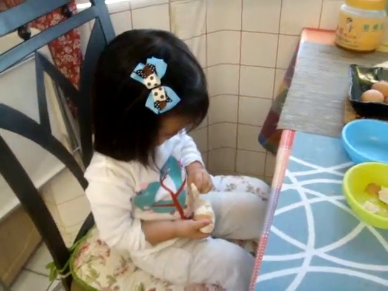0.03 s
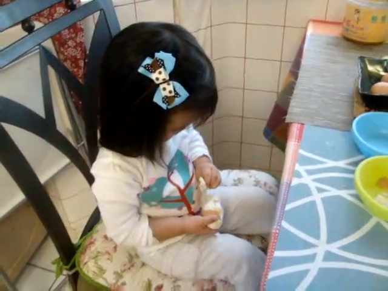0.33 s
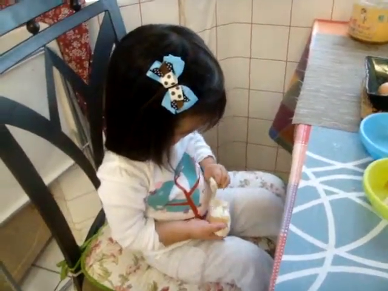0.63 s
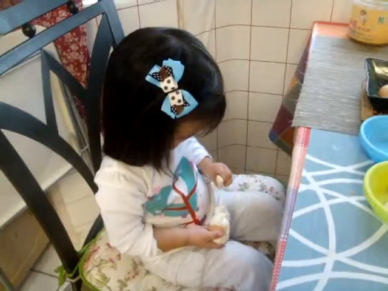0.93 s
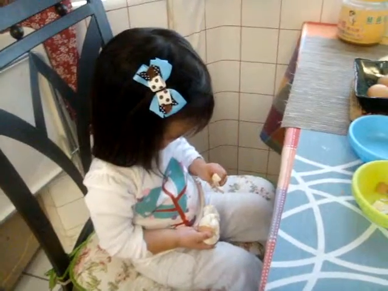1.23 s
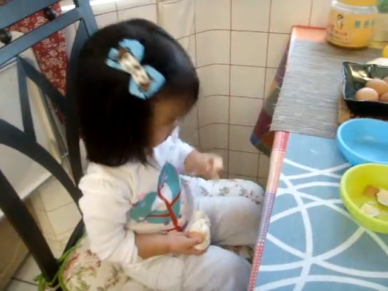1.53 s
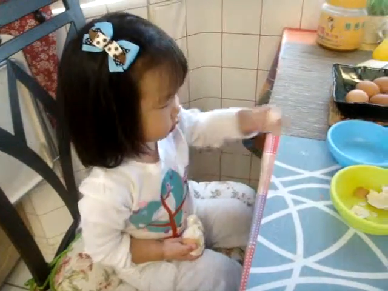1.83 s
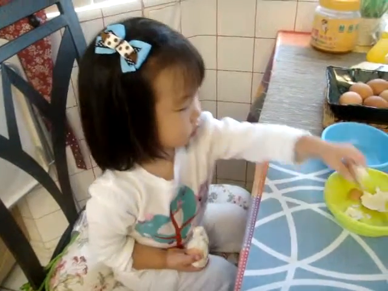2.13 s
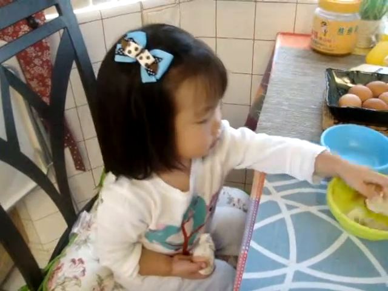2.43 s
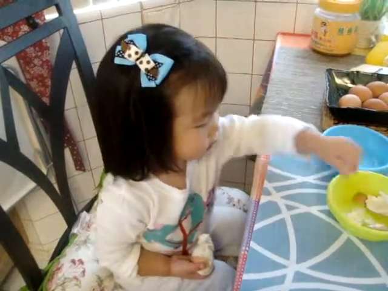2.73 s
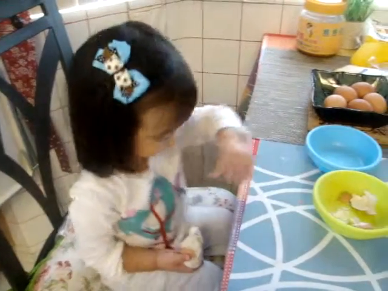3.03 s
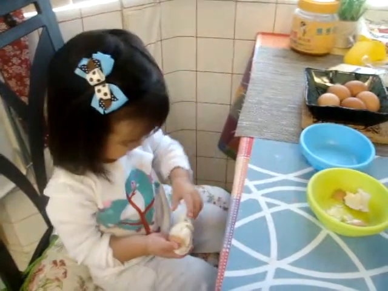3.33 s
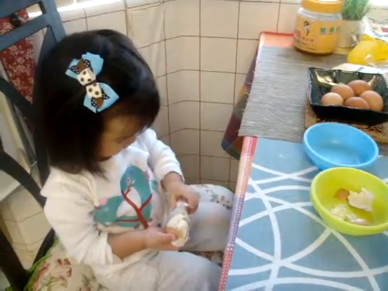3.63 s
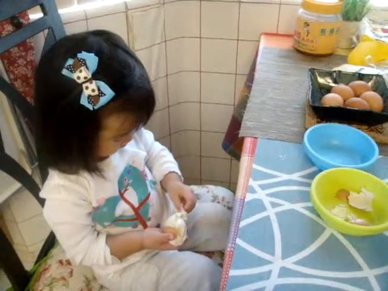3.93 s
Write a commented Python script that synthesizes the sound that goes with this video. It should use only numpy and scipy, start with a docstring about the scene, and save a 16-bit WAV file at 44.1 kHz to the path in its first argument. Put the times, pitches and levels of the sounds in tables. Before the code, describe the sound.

A boiled egg is peeled in a quiet tiled kitchen: tiny crisp cracks, a slight squeak, then shell dropping into a plastic bowl. A spinning appliance hums softly and dies down before the final faint cracks.

```python
"""A boiled egg is peeled by hand in a small tiled kitchen, over room noise and a spinning appliance's hum.
In the first second the shell snaps and crackles in little bursts; then it rubs with a tiny squeak.
At about 2.3 seconds a piece drops into a plastic bowl, clatters and settles, with a faint falling squeak.
Near 3 seconds the hum dies down, a deep rumble swells briefly, and the shell gives a few last cracks."""
import sys
import numpy as np
from scipy import signal
from scipy.fft import rfft, irfft
from scipy.io import wavfile

SR = 44100
rng = np.random.default_rng(int(sys.argv[2]) if len(sys.argv) > 2 else 0)


def wav_record(signal):
    """Record a signal, one row per channel, as 16-bit PCM in the file named by sys.argv[1]."""
    frames = np.transpose(np.atleast_2d(signal))
    bounded = np.clip(frames, -1, 1)
    # unit amplitude maps onto the largest positive 16-bit level
    quanta = np.round(bounded * 32767).astype(np.int16)
    wavfile.write(sys.argv[1], SR, quanta)


N = 176400
TIME = np.arange(N) / SR
TOP_HZ = 10020


def from_db(db):
    """Turn decibels into a number to multiply by."""
    return 10 ** (np.asarray(db) / 20)


def fade(t, fade_s):
    """A dying away that falls 60 dB every fade_s seconds."""
    return from_db(-60 * t / fade_s)


def unit_level(x):
    """Scale a signal so its average (rms) level is 1."""
    return x / np.sqrt(np.mean(x ** 2) + 1e-20)


def keep_side(x, hz, side, order=2):
    """Let through the "high" or "low" side of hz; a higher order cuts more steeply."""
    sos = signal.butter(order, np.clip(hz, 10, .45 * SR), side, fs=SR, output="sos")
    return signal.sosfilt(sos, x + 1e-18)


def keep_band(x, low_hz, high_hz, low_order=4):
    """Let through what lies between two frequencies."""
    return keep_side(keep_side(x, low_hz, "high", low_order), high_hz, "low", order=4)


def shaped_noise(shape):
    """Noise at level 1 whose tone follows rows of (Hz, dB)."""
    hz, db = np.transpose(shape)
    bins = np.maximum(np.fft.rfftfreq(N, 1 / SR), 1)
    gain = from_db(np.interp(np.log(bins), np.log(hz), db))
    return unit_level(irfft(rfft(rng.standard_normal(N)) * gain, N))


def drift(per_s):
    """A smooth random wobble of size about 1."""
    bins = np.fft.rfftfreq(N, 1 / SR)
    return unit_level(irfft(rfft(rng.standard_normal(N)) / (1 + (bins / per_s) ** 2) ** 2, N))


def gate(start, length, ramp_s):
    """Fade in, hold, and fade out again."""
    return np.clip(np.minimum(TIME - start, start + length - TIME) / ramp_s, 0, 1)


def burst(fade_s, low_hz, high_hz=TOP_HZ, rise_s=0.00025):
    """A crack or tap: a spurt of noise that dies at once."""
    t = TIME[:SR // 10]
    decay = fade(t, fade_s)
    spurt = rng.standard_normal(len(t)) * decay * np.minimum(t / rise_s, 1)
    spurt = keep_band(spurt, low_hz, high_hz)
    return spurt * np.sqrt(np.sum(decay ** 2) / np.sum(spurt ** 2))


def add(out, start, x):
    """Mix x into out, beginning at start seconds."""
    i = int(np.clip(start * SR, 0, N - 1))
    out[i:i + len(x)] += x[:N - i]


# The tone of the room noise. Each row: frequency in Hz, relative strength in dB.
ROOM_TONE = [(20, -27), (32, -10), (42, -2.5), (58, -2), (80, -4), (115, -2.5), (170, 8), (230, 1.5),
             (350, 3), (520, -2), (660, 0.5), (800, 4.5), (960, 3), (1120, -3), (1450, -3.5), (2200, -13),
             (3500, -18), (6000, -20.5), (10000, -22.5)]


def room_noise():
    """A soft, steady rush, mostly low and middle tones."""
    return from_db(-46.5) * shaped_noise(ROOM_TONE)


def deep_swell(peak_s=3.4, half_width_s=0.23):
    """A faint, deep rumble that comes and goes."""
    rumble = unit_level(keep_band(rng.standard_normal(N), low_hz=42, high_hz=62))
    return from_db(-61) * np.exp(-((TIME - peak_s) / half_width_s) ** 2) * rumble


# How fast the appliance spins. Each row: time in seconds, turns per second.
SPIN_SPEED = [(0, 19.72), (.6, 19.95), (1.5, 20.07), (2.4, 20.19), (4, 20.17)]
# How its loudness changes. Each row: time in seconds, relative level in dB.
APPLIANCE_LEVEL = [(0, -46), (.75, -46), (.96, -43.5), (1.13, -48.5), (1.35, -45), (1.58, -45), (1.78, -43),
                   (2.25, -43.5), (2.65, -47.5), (2.98, -48), (3.15, -64.5), (4, -60.5)]
# The tones in its hum. Each row: vibrations per turn, relative level in dB.
HUM_TONES = [(6, -24.5), (7, -23.5), (8, -15), (9, 1), (10, -12.5), (11, -5), (12, -11), (13, -15),
             (14, -10), (17, -15), (19, -18), (21, -29.5)]
# The tone of its rumble. Each row: frequency in Hz, relative strength in dB.
RUMBLE_TONE = [(60, -38), (130, -28.5), (170, 2), (225, -2.5), (290, -11), (380, -10.5), (600, -13),
               (1500, -32.5)]


def appliance(waver_db=0.86):
    """An off-balance spinning part hums at multiples of its turning speed, over a low rumble."""
    turns_per_s = np.interp(TIME, *np.transpose(SPIN_SPEED))
    level_db = np.interp(TIME, *np.transpose(APPLIANCE_LEVEL))
    angle = 2 * np.pi * np.cumsum(turns_per_s) / SR
    hum = np.zeros(N)
    for per_turn, db in HUM_TONES:
        gain = from_db(db - waver_db * drift(per_s=3.1))
        hum += gain * np.sin(per_turn * angle + rng.uniform(0, 2 * np.pi))
    rumble = from_db(-9.5) * shaped_noise(RUMBLE_TONE)
    return from_db(level_db - 2.5) * (np.sqrt(2) * hum + rumble)


def kitchen_echo(sound, first_echo_s=0.0031):
    """Sound bounces off the tiles and table top in a blur of echoes."""
    t = TIME[:SR // 2]
    tail = rng.standard_normal(len(t)) * fade(t, fade_s=0.91) * (t > first_echo_s)
    return signal.fftconvolve(sound, tail / np.sqrt(np.sum(tail ** 2)))[:N]


# Squeaks of shell. Each row: start and length in seconds, first, middle and last pitch in Hz,
# level in dB, pitch wobble in Hz.
SHELL_SQUEAKS = [(1.41, 0.041, 5020, 5200, 5330, -57, 422), (2.427, .215, 4680, 4100, 3850, -64, 80)]


def squeaks(flutter_db=2):
    """Thin, unsteady whistles slide in pitch as shell rubs under the fingers."""
    out = np.zeros(N)
    for start, length, first_hz, middle_hz, last_hz, db, wobble_hz in SHELL_SQUEAKS:
        slide = np.interp(TIME - start, [0, length / 2, length], [first_hz, middle_hz, last_hz])
        hz = slide + wobble_hz * drift(per_s=450)
        gain = gate(start, length, ramp_s=0.013) * from_db(db + flutter_db * drift(per_s=80))
        out += gain * np.sin(2 * np.pi * np.cumsum(hz) / SR)
    return out


# The notes the bowl rings with. Each row: pitch in Hz, relative level in dB, fade time in seconds.
BOWL_NOTES = [(1010, -11, 0.14), (1190, -13, 0.045), (1647, -5.5, 0.026), (1800, -9, .02), (2450, -13, .06),
              (2570, -7.5, 0.027), (2715, 0, .025), (2886, 1, 0.043), (3570, -8, 0.027), (3820, -20, 0.079),
              (4900, -18, .05), (6500, -16, 0.03)]
# Shell hitting the bowl and the pieces in it. Each row: start in seconds, tick level in dB,
# the tick's lowest frequency in Hz, knock level in dB.
BOWL_HITS = [(2.2928, -23, 4800, -37), (2.2989, -28, 3800, -26.5), (2.3034, -35, 2400, -32.5),
             (2.3060, -34, 5000, -43), (2.3138, -37, 3500, -43), (2.3243, -46, 3800, -40),
             (2.3352, -43, 3800, -46), (2.3398, -42, 5500, -47), (2.3455, -24, 2600, -55),
             (2.3512, -28.5, 5000, -56), (2.356, -36, 6500, -51), (2.3648, -32, 3200, -51),
             (2.3695, -42, 5000, -51), (2.3777, -40, 4500, -52), (2.3885, -37, 4800, -58),
             (2.3907, -38, 4800, -58), (2.4254, -39, 7500, -60), (2.4305, -38, 4500, -60),
             (2.489, -46, 8500, -65), (2.523, -36.5, 8400, -65)]


def bowl_clatter(low_hz=690, ring_db=-2.5):
    """Each hit is a bright tick of shell and a knock that briefly rings the bowl."""
    out, t = np.zeros(N), TIME[:SR // 4]
    for start, tick_db, tick_low_hz, knock_db in BOWL_HITS:
        ring = np.zeros(len(t))
        for hz, db, fade_s in BOWL_NOTES:
            strength = from_db(db + rng.normal(0, 2.4)) * rng.choice([-1, 1])  # no two hits ring alike
            ring += strength * np.sin(2 * np.pi * hz * t) * fade(t, fade_s)
        add(out, start, from_db(tick_db) * burst(fade_s=0.016, low_hz=tick_low_hz))
        knock = burst(fade_s=0.019, low_hz=low_hz, high_hz=4700)
        add(out, start, from_db(knock_db) * keep_side(knock, low_hz, "high", order=4))
        add(out, start, from_db(knock_db + ring_db) * keep_side(ring, low_hz, "high", order=4))
    return out


# Patches of crumbling shell. Each row: start and length in seconds, level in dB,
# lowest and highest frequency in Hz.
SHELL_CRACKLES = [(0, 0.064, -48.5, 3300, 6800), (.062, 0.082, -58.5, 2500, 6550),
                  (.26, .03, -60.5, 4500, 8000), (0.472, 0.021, -58, 4500, 9000),
                  (0.554, 0.051, -60, 5500, 11000), (0.624, 0.081, -55, 4600, 12000),
                  (0.722, 0.072, -55.5, 2800, 12000), (2.243, 0.022, -47, 5200, 12000),
                  (2.296, 0.026, -47, 3000, 11000), (2.351, 0.051, -53, 5200, 11100),
                  (2.42, 0.019, -55, 4500, 11000), (3.362, 0.1, -62.5, 4500, 10000),
                  (3.788, 0.046, -61, 5000, 11000)]


def crackles(cracks_per_s=1100, spread_db=0.5, fade_s=0.0045):
    """Bending and rubbing the shell sets off crowds of tiny, uneven cracks."""
    out = np.zeros(N)
    starts = rng.random(N) < cracks_per_s / SR
    cracks = starts * from_db(spread_db * np.minimum(rng.exponential(1, N), 4))
    loudness = signal.lfilter([1], [1, -fade(1 / SR, fade_s)], cracks + 1e-18)  # each crack dies away
    grit = keep_side(loudness * rng.standard_normal(N), TOP_HZ, "low", order=6)
    for start, length, db, low_hz, high_hz in SHELL_CRACKLES:
        patch = keep_band(grit * gate(start, length, ramp_s=0.0042), low_hz, high_hz, low_order=3)
        out += from_db(db) * patch * np.sqrt(length * SR / (np.sum(patch ** 2) + 1e-12))
    return out


# Single snaps of shell. Each row: start in seconds, level in dB, the crack's lowest and highest
# frequency in Hz, ring level in dB compared with the crack.
SHELL_SNAPS = [(0.0158, -30.5, 4000, 10000, -9), (0.0263, -31.5, 2300, 6600, -17),
               (.032, -40, 1790, 6200, -9), (0.0374, -33, 2200, 6000, -17), (0.043, -43, 2500, 6500, -9),
               (0.0488, -41, 3200, 6800, -12), (0.079, -38, 1800, 6040, -14),
               (.4735, -41.5, 3000, 10000, -14), (.555, -41, 5500, 11000, -16),
               (0.5915, -42, 4500, 10000, -16), (0.6412, -29.5, 6000, 12000, -20),
               (.6495, -42, 6000, 11000, -20), (0.655, -44, 6500, 11000, -20),
               (.662, -43, 5000, 11000, -20), (0.6655, -42, 6500, 11000, -20),
               (.6795, -36, 6500, 11000, -20), (.683, -43, 6500, 11000, -20),
               (0.6977, -39, 6000, 10000, -20), (0.7260, -31, 5500, 12000, -20),
               (0.7432, -45, 2600, 9000, -17), (.7675, -47, 4500, 11000, -18),
               (0.79, -45, 4000, 11000, -18), (0.7945, -42, 3500, 11000, -18),
               (3.9452, -34, 6840, 11000, -7), (3.986, -41.5, 7500, 11000, -5)]


def snaps():
    """Bits of shell break off, each with a bright crack, a duller body and an instant of ringing."""
    out = np.zeros(N)
    for start, db, low_hz, high_hz, ring_db in SHELL_SNAPS:
        body = from_db(-16) * burst(fade_s=0.0061, low_hz=2000, high_hz=low_hz)
        ring = from_db(ring_db) * burst(fade_s=0.0086, low_hz=4500, high_hz=4700)
        crack = burst(fade_s=0.0061, low_hz=low_hz, high_hz=high_hz)
        add(out, start, from_db(db) * (crack + body + ring))
    return out


def scene():
    """The shell sounds and their echoes over the background, in one channel."""
    shell = snaps() + crackles() + squeaks() + bowl_clatter()
    echoes = from_db(-17.5) * kitchen_echo(shell)
    return (shell + echoes + appliance() + deep_swell() + room_noise())[None]


def record(dry):
    """Cut away the highest treble steeply."""
    treble_cut = signal.ellip(9, .1, 40, TOP_HZ, fs=SR, output="sos")
    return signal.sosfiltfilt(treble_cut, dry, padtype="even")


dry = scene()
out = record(dry)
wav_record(out)
```